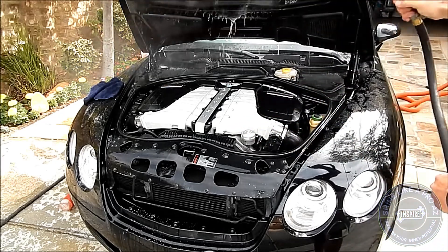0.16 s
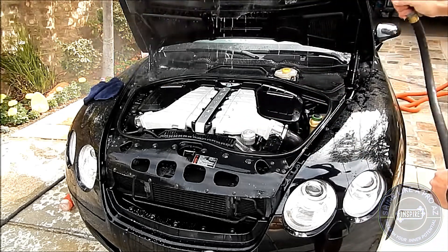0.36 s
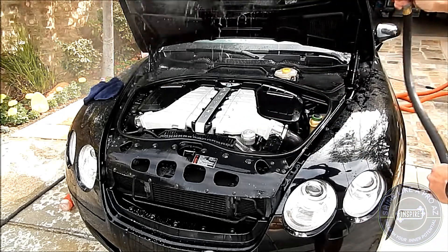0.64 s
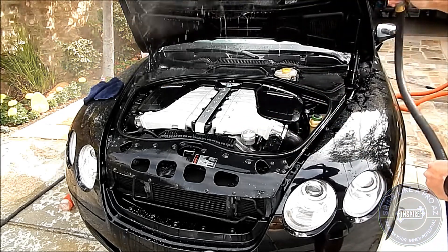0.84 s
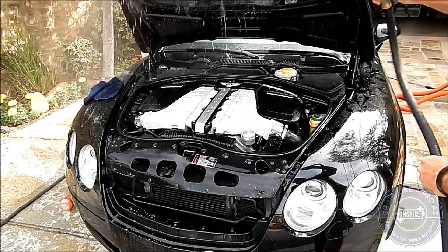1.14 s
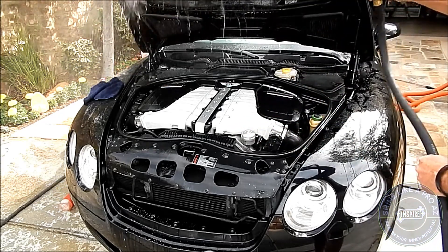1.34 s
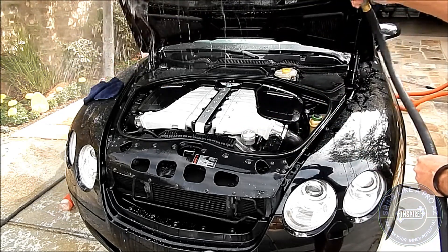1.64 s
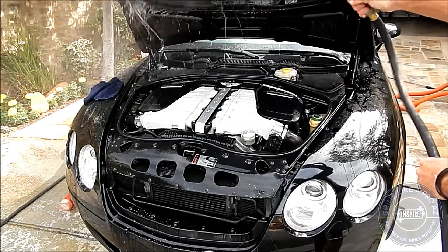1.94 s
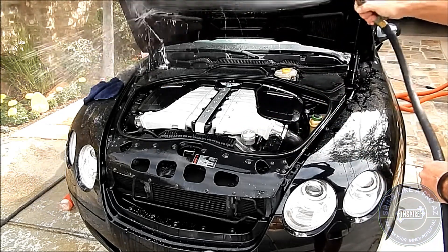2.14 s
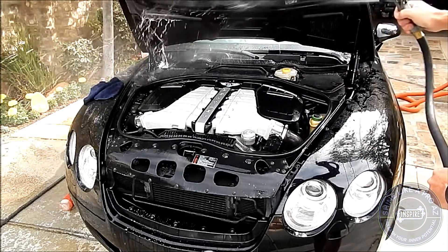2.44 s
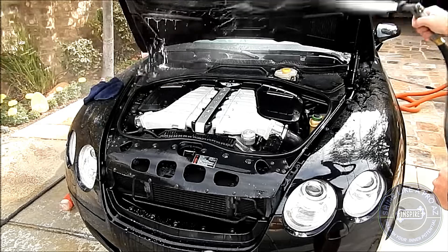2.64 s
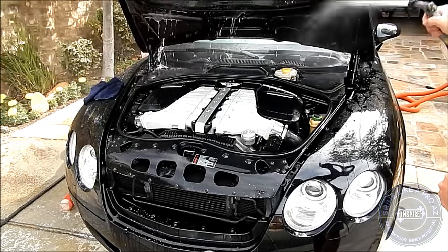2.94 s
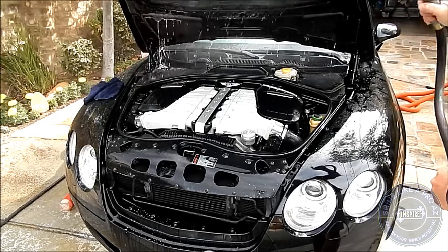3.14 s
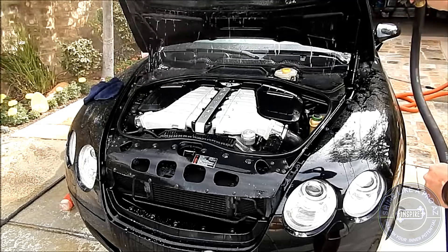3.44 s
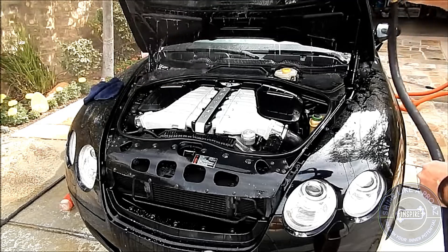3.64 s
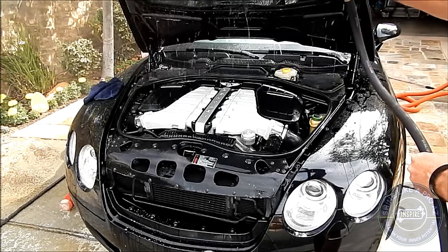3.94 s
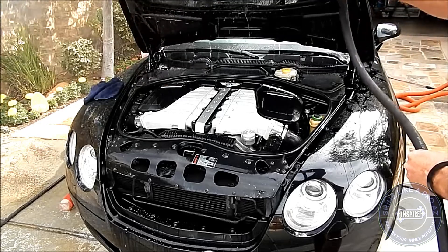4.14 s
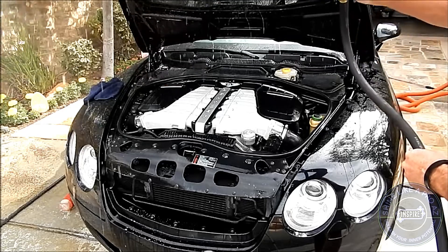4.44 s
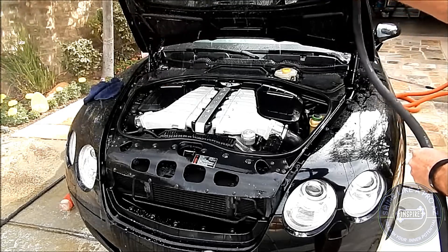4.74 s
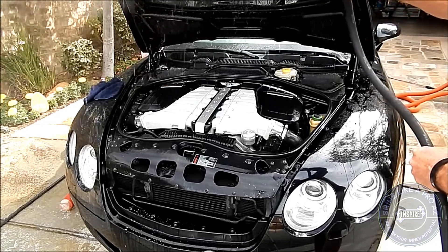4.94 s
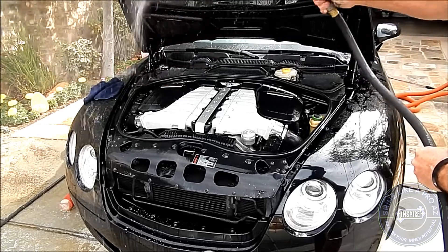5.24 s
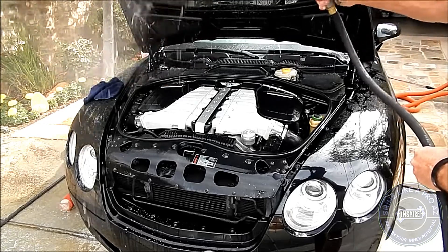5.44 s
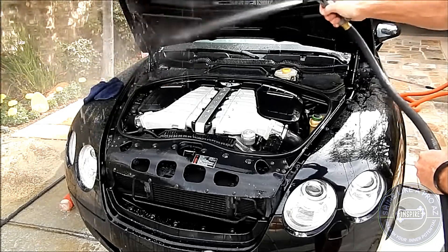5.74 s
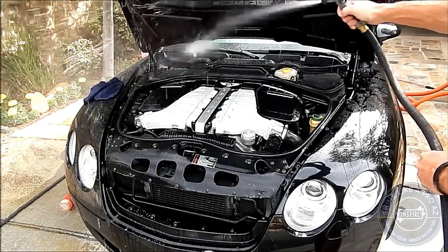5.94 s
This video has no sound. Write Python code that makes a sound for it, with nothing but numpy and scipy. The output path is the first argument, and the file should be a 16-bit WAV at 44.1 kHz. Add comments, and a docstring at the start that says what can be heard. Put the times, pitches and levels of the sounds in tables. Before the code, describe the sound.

A close, sputtering hose jet spatters against the sheet metal under a car hood, surging irregularly amid fizzing spray.

```python
"""Beside a car with its hood raised, a small stereo camera close to the metal.
A garden hose is flicked in short strokes over the hood's underside. The jet drums on the sheet metal,
whose broad resonances change with the spot it strikes, and spray fizzes all round the microphones.
Slugs of water ring single notes, the jet slaps onto new spots, and the hood shudders underneath.
The loudest moments overload the recorder."""
import sys
import numpy as np
from scipy import signal
from scipy.fft import rfft, irfft, next_fast_len
from scipy.io import wavfile
from scipy.ndimage import uniform_filter1d, map_coordinates

SR = 44100
rng = np.random.default_rng(int(sys.argv[2]) if len(sys.argv) > 2 else 0)


def pcm_store(signal):
    """Save signal as 16-bit PCM."""
    levels = np.round(np.clip(np.atleast_2d(signal), -1, 1) * 32767)
    wavfile.write(sys.argv[1], SR, levels.astype(np.int16).T)


N = 268348

# Flicks of the wrist that lay the jet on the panel. Each row: start in seconds, length in seconds,
# then the relative levels of force, mist and boom in dB.
FLICKS = [(-0.083, 0.18, -12.5, -17, -24.5), (0.138, 0.16, -14, -16, -24.5),
          (0.329, 0.017, -18.5, -15, -37.1), (0.392, 0.089, -14.5, -15.5, -20.7),
          (0.52, 0.03, -16.5, -14.5, -25), (0.576, 0.096, -15, -15.5, -20.9),
          (0.672, 0.13, -15, -15, -23.5), (0.846, 0.02, -20.5, -17, -24), (0.904, 0.026, -16, -22, -21),
          (0.963, 0.054, -14, -14.5, -25), (1.074, 0.15, -12.5, -14.0, -23.2),
          (1.272, 0.064, -10.5, -14.5, -19.5), (1.394, 0.15, -13, -16, -22.5),
          (1.598, 0.11, -13.5, -16, -22.2), (1.783, 0.088, -14.5, -19, -24.5),
          (1.918, 0.076, -13.5, -14.6, -26.8), (2.084, 0.19, -16.5, -14.5, -25),
          (2.302, 0.064, -16.5, -15, -28), (2.398, 0.027, -13.5, -15, -26),
          (2.506, 0.089, -11.5, -15.3, -33), (2.638, 0.077, -10, -15.1, -28.5),
          (2.818, 0.022, -15.5, -25, -33), (2.888, 0.047, -13, -20, -24),
          (2.984, 0.17, -11.5, -15.7, -28.5), (3.147, 0.13, -16.5, -18, -41),
          (3.416, 0.054, -14, -15.9, -40), (3.561, 0.25, -20.5, -23, -46),
          (3.783, 0.29, -19.6, -16.5, -34.5), (4.075, 0.057, -9.5, -16.6, -26),
          (4.187, 0.064, -9.5, -14.5, -24), (4.377, 0.21, -16.5, -16, -34.5),
          (4.596, 0.119, -14, -12.5, -32), (4.708, 0.11, -15, -14, -30), (4.902, 0.07, -17, -14.5, -23.5),
          (4.987, 0.13, -13, -15.5, -20.5), (5.18, 0.053, -17, -17.5, -22), (5.265, 0.13, -12, -16, -26),
          (5.38, 0.15, -18.5, -14, -40), (5.564, 0.04, -7.5, -17, -33), (5.704, 0.016, -19.5, -37, -33),
          (5.759, 0.057, -16, -16, -34.4), (5.943, 0.071, -16.5, -16.6, -38),
          (6.056, 0.036, -22, -20, -25.7)]
FORCE_COLUMN, MIST_COLUMN, BOOM_COLUMN = 2, 3, 4
# Colour of the struck spot. Each row: time in seconds, weights of roar, hollow, cup and bite in dB,
# centre of the boom in Hz.
SPOT_COLOURS = [(0, -4, -16.5, -12.5, -13, 417.4), (.5, -0.5, -12, -2.5, -11, 425),
                (.9, -3, -13.5, -5.5, -14, 408.3), (1.3, -4, -16, -10, -14, 429.5),
                (1.75, -0.5, -15.5, -6.5, -10, 429.3), (2.1, 1, -10, -8.5, -7, 420.7),
                (2.45, -5, -16.5, -14, -6.5, 426), (2.8, -5.5, -17, -12, -12, 432),
                (3.25, -2, -16, -14, 1.5, 427.6), (3.47, -3.5, -23.5, -18, -4.5, 439.5),
                (3.65, -3.5, -11, -18, -11, 443), (4.0, -2.5, -15, -18, -8, 443.5),
                (4.2, -6, -14.5, -9.5, -13, 456), (4.7, -4.5, -12.5, -16.5, -9, 455),
                (5.1, 0.5, -13, -8, -9.5, 460), (5.35, -3, -12.5, -10.5, -16, 401.6),
                (5.56, -5.5, -22.5, -15, -9, 429.6), (6.08, -2.5, -11, -17, -9, 426)]
# The jet skims an edge. Each row: time of the cut in seconds, depth in dB.
EDGE_SKIMS = [(.1, -1), (.815, 2), (1.73, 2.5), (2.015, 6), (2.275, 3.5), (2.425, 5.5), (3.505, 2.5),
              (4.15, -0.5), (4.255, 3), (4.965, 7), (5.425, 3.5), (5.27, 4), (5.525, 2), (5.675, 3.5),
              (5.844, 5), (6.085, 10)]
# Slugs of water that ring the metal. Each row: middle in seconds, pitch in Hz, relative peak in dB,
# half-length in seconds.
SLUGS = [(0.24, 450, -21, 0.026), (0.313, 398, -18.5, 0.027), (0.476, 423, -24, .035),
         (0.617, 430, -18, 0.032), (0.664, 1200, -8.5, 0.013), (0.754, 370, -13, 0.012),
         (0.938, 377.7, -15, 0.026), (1.158, 423, -16, 0.023), (1.302, 430.6, -22, 0.031),
         (1.544, 1680, -13, 0.014), (1.692, 461, -17.5, 0.033), (1.838, 1170, -15.5, 0.027),
         (1.978, 2260, -18, 0.038), (1.993, 2687, -17.5, 0.031), (2.591, 1509, -17.5, 0.045),
         (2.692, 456, -23, 0.039), (3.053, 2150, -6, 0.012), (3.458, 1755, -13, 0.024),
         (3.471, 1930, -30, 0.028), (4.135, 2356, -9, 0.014), (4.244, 459, -18, 0.038),
         (5.374, 405.8, -23, 0.027), (5.606, 1843, -11, 0.036), (5.608, 2277, -15, 0.032),
         (5.609, 2050, -21, 0.066), (5.622, 1650, -18, 0.045), (6.021, 1760, -11, 0.011)]
# The jet lands on a new spot. Each row: start in seconds, relative level in dB, seconds to fall 60 dB.
LANDINGS = [(.045, -12, .07), (.195, -12, .08), (.425, -8, 0.073), (.6, -8.5, .08), (.709, -22, .08),
            (.79, -17, .05), (1.514, -9, 0.063), (2.55, -9, 0.074), (2.9, -12.5, 0.12), (3.045, -26, 0.06),
            (3.797, -6, 0.013), (4.032, -7, 0.044), (4.926, -8.5, .09), (5.37, -15, .06), (5.76, -10, .08),
            (5.977, -6, 0.053)]
# How hard the hood shakes. Each row: time in seconds, relative level in dB.
SHUDDER_LEVELS = [(0.0, -28), (0.1, -40), (0.15, -29.5), (1.83, -36.5), (1.91, -28), (3.01, -49.5),
                  (3.05, -44), (3.61, -54), (4.17, -44), (5.06, -44.5), (5.54, -59), (5.61, -40),
                  (5.65, -55), (6.08, -54)]

# Resonances of the hood under the water. Each row: centre in Hz, width in Hz, relative level in dB.
ROAR_MODES = [(1727, 960, 3), (2040, 900, 6)]
HOLLOW_MODES = [(622, 270, -5.5), (850, 760, -2.5)]
CUP_MODES = [(1253, 820, 0)]
RUMBLE_MODES = [(61, 87, 5), (112, 52, 1.5), (325, 63, 12.5)]
SIZZLE_MODES = [(2970, 1400, 1.6), (3820, 1760, 2.4)]
BITE_MODES = [(4240, 2600, 0.84), (5260, 1800, -1.9)]
BOOM_MODES = [(422, 160, 1.5)]
SLAP_MODES = [(600, 480, -24), (1910, 3400, 8), (4970, 5800, 2)]
SHUDDER_MODES = [(89, 48, -9), (147, 27, -3), (186.7, 46, -2.5)]
# Spectrum of the mist. Each row: frequency in Hz, relative level in dB.
MIST_SPECTRUM = [(2500, -58), (5000, -8.5), (6300, -4.5), (7000, -3), (8500, -1), (10500, -2), (13000, -6),
                 (15600, -13), (20000, -14)]

# How alike the two microphones hear the water. Each row: frequency in Hz, correlation from 0 to 1.
MIC_LIKENESS = [(30, 0.73), (150, 0.86), (500, 0.92), (1200, 0.84), (2200, 0.67), (3500, 0.36),
                (7000, 0.19), (14000, 0.022)]
# Two narrow gaps in the treble. Each row: centre in Hz, width in Hz.
NARROW_DIPS = [(2500, 31), (7500, 31)]
RECORDER_TOP_HZ = 15700


def jet():
    """Close up, the sputtering jet roars on the panel and in its ribs' hollows, and breaks into mist."""
    roar_db, hollow_db, cup_db, bite_db, _ = curves(SPOT_COLOURS)
    flutter_db = 1.2 * wobble(rate_hz=30)  # air in the hose makes the flow flutter
    skim_db = skim_swing_db()
    force_db = flick_level_db(FORCE_COLUMN, rise_db=5.5, rise_share=0.47, fall_db_per_s=159)
    force_db += 0.43 * skim_db + flutter_db
    mist_db = flick_level_db(MIST_COLUMN, rise_db=2.5, rise_share=0.46, fall_db_per_s=82)
    mist_db += skim_db + flutter_db + 0.27 * wobble(rate_hz=14)
    splash_db = 0.64 * force_db + 0.3 * mist_db + 0.42  # the splash lies between blow and spray

    panel = amp(roar_db) * drops(resonant(ROAR_MODES), spread_db=1, patchy_db=2.8)
    panel += amp(hollow_db + 3) * drops(resonant(HOLLOW_MODES), spread_db=10.5, patchy_db=3.5)
    panel += amp(cup_db + 1) * drops(resonant(CUP_MODES), spread_db=7, patchy_db=4.2)
    panel += amp(0.68 * hollow_db - 18.5) * drops(resonant(RUMBLE_MODES), spread_db=3, patchy_db=4.5)
    splash = amp(-4.5) * drops(resonant(SIZZLE_MODES), spread_db=0.5, patchy_db=3.2)
    splash += amp(bite_db + 1) * drops(resonant(BITE_MODES), spread_db=4, patchy_db=4.5)
    mist = drops(lambda hz: amp(at_frequency(MIST_SPECTRUM, hz)), spread_db=7.5, patchy_db=2)
    return amp(force_db) * panel + amp(splash_db) * splash + amp(mist_db + 0.26) * mist


def flick_level_db(column, rise_db, rise_share, fall_db_per_s, lull_db=-60):
    """Level of all flicks together: each swells over its first part, holds, then drops away."""
    t, rows = np.arange(0, N + 64, 64) / SR, np.array(FLICKS)
    since, length = t - rows[:, :1], rows[:, 1:2]
    rise_left = np.clip(1 - since / (rise_share * length), 0, 1)
    outside_s = np.maximum(since - length, 0) + np.maximum(-since, 0)
    each_db = rows[:, column, None] - rise_db * rise_left - fall_db_per_s * outside_s
    power = np.sum(amp(each_db) ** 2, axis=0) + amp(lull_db) ** 2
    return np.interp(np.arange(N) / SR, t, 10 * np.log10(power))


def skim_swing_db(build_s=0.017, cut_s=0.006, return_s=0.047):
    """As the jet skims an edge, the mist builds up, is cut off and returns."""
    swing_db = np.zeros(N)
    for time_s, depth_db in EDGE_SKIMS:
        since = np.arange(N) / SR - time_s
        nearness = np.exp(-np.abs(since) / np.where(since < 0, build_s, return_s))
        swing_db -= depth_db * np.tanh(since / cut_s) * nearness
    return swing_db


def panel_boom():
    """The panel booms under each flick, sliding in pitch as the jet wanders."""
    boom_db = flick_level_db(BOOM_COLUMN, rise_db=6, rise_share=0.83, fall_db_per_s=222, lull_db=-40)
    boom = signal.hilbert(drops(resonant(BOOM_MODES), spread_db=5.5, patchy_db=1))
    shift_hz = curves(SPOT_COLOURS)[-1] - BOOM_MODES[0][0]
    slide = np.exp(2j * np.pi * np.cumsum(shift_hz) / SR)
    return amp(boom_db - 1.3) * np.real(boom * slide)


def slug_rings():
    """Each slug of water rings the metal on one slightly unsteady note that swells and fades."""
    t, notes = np.arange(N) / SR, np.zeros(N)
    phase_drift = 0.62 * wobble(rate_hz=40)
    for middle_s, hz, db, half_length_s in SLUGS:
        near = slice(max(round((middle_s - 0.12) * SR), 0), round((middle_s + 0.12) * SR))
        swell = np.exp(-2 * ((t[near] - middle_s) / half_length_s) ** 2)
        phase = 2 * np.pi * (hz * t[near] + rng.random()) + phase_drift[near]
        notes[near] += amp(db) * swell * np.sin(phase)
    return notes


def splats(attack_s=0.0026):
    """The jet slaps onto a new spot: a sudden wet burst that dies quickly."""
    bursts = np.zeros(N)
    for start_s, db, decay_s in LANDINGS:
        since = np.maximum(np.arange(N) / SR - start_s, 0)
        bursts += amp(db - 60 * since / decay_s) * np.minimum(since / attack_s, 1)
    return bursts * drops(resonant(SLAP_MODES), spread_db=1, patchy_db=2)


def hood_shudder():
    """Low behind the water, the hood shakes on its hinges under the jet."""
    level_db = curves(SHUDDER_LEVELS)[0] - 4 + 1.6 * wobble(rate_hz=11)
    return amp(level_db) * drops(resonant(SHUDDER_MODES), spread_db=4.5, patchy_db=2.5)


def drops(colour, spread_db, patchy_db):
    """Stereo hail of tiny impacts of uneven size, strong in shifting patches of pitch and time."""
    hail = rng.standard_normal((2, N))
    hail *= amp(spread_db * uniform_filter1d(rng.standard_normal(N), size=12))
    spectra = signal.stft(hail, nperseg=1024)[2]
    patches = uniform_filter1d(rng.standard_normal(spectra.shape[1:]), size=3, axis=0)
    patches = unit_rms(uniform_filter1d(patches, size=4, axis=1))
    patchy_hail = signal.istft(spectra * amp(patchy_db * patches), nperseg=1024)[1][:, :N]

    def mid_side_response(hz):
        """The lows sit near the middle; the treble spreads wide."""
        angle = np.arccos(at_frequency(MIC_LIKENESS, hz)) / 2
        return colour(hz) * [np.cos(angle), np.sin(angle)]
    mid, side = filtered(patchy_hail, mid_side_response)
    return unit_rms(np.array([mid + side, mid - side]))


def resonant(modes):
    """Steep response: the powers of the resonances add, each one applied twice."""
    def peak(hz, centre, width):
        return (hz * width) ** 2 / ((centre ** 2 - hz ** 2) ** 2 + (hz * width) ** 2 + 1e-9)
    return lambda hz: np.sqrt(sum((amp(db) * peak(hz, centre, width)) ** 2 for centre, width, db in modes))


def amp(db):
    """Gain of a level in dB."""
    return 10 ** (np.asarray(db) / 20)


def unit_rms(x):
    """x at rms 1."""
    return x / np.sqrt(np.mean(x ** 2) + 1e-20)


def at_frequency(points, hz):
    """Rows of frequency and value, read on a log axis."""
    knots_hz, values = np.transpose(points)
    return np.interp(np.log(hz + 1), np.log(knots_hz + 1), values)


def curves(rows):
    """One value per sample for each column after the time."""
    times, *columns = np.transpose(rows)
    return [np.interp(np.arange(N) / SR, times, column) for column in columns]


def wobble(rate_hz):
    """A smooth random curve with rate_hz knots a second."""
    knots = rng.standard_normal(int(N * rate_hz / SR) + 4)
    return map_coordinates(knots, [np.arange(N) * rate_hz / SR])


def filtered(x, response):
    """x shaped by a frequency response."""
    size = next_fast_len(N + 8192)
    return irfft(rfft(x, size) * response(np.fft.rfftfreq(size, 1 / SR)), size)[..., :N]


def scene():
    """From the camera, the nozzle is a little right of centre."""
    water_on_hood = jet() + panel_boom() + slug_rings() + splats() + hood_shudder()
    balance = amp([[-0.6], [0.6]])
    return water_on_hood * balance * amp(2.92)


def record(dry):
    """Two narrow dips in the treble, then the camera's recorder: overload at full scale, then the band limit."""
    def dips(hz):
        return np.prod([1 - np.exp(-np.abs(hz - centre) / width) for centre, width in NARROW_DIPS], 0)
    overloaded = np.clip(filtered(dry, dips), -1, 1)
    return filtered(overloaded, lambda hz: hz < RECORDER_TOP_HZ)


dry = scene()
out = record(dry)
pcm_store(out)
```